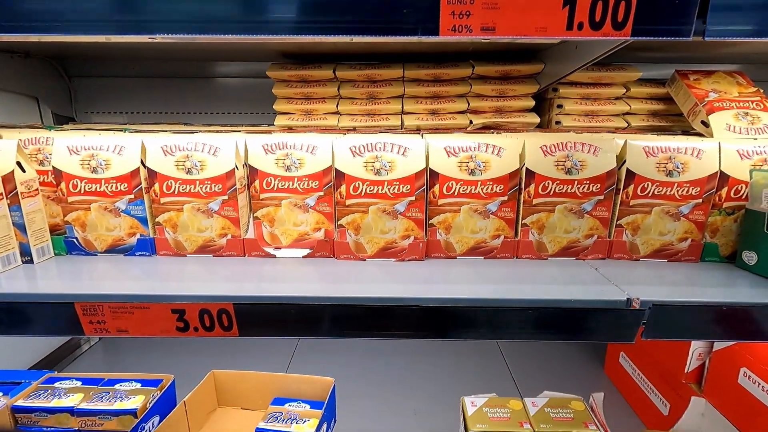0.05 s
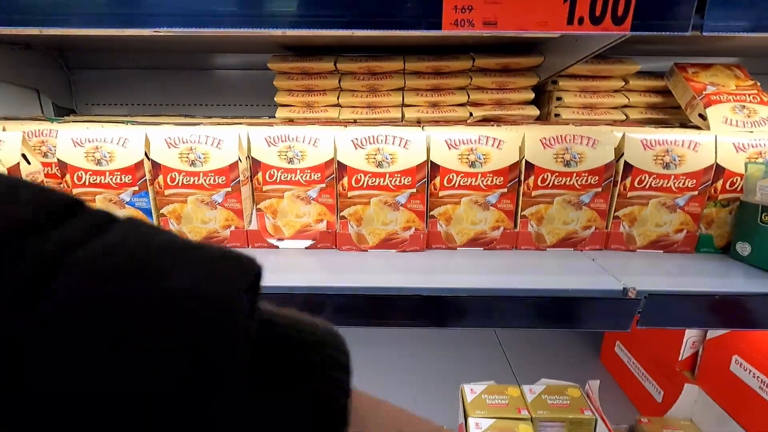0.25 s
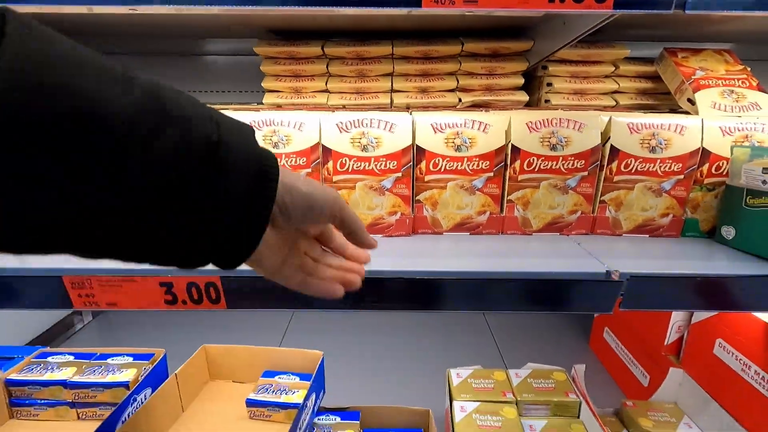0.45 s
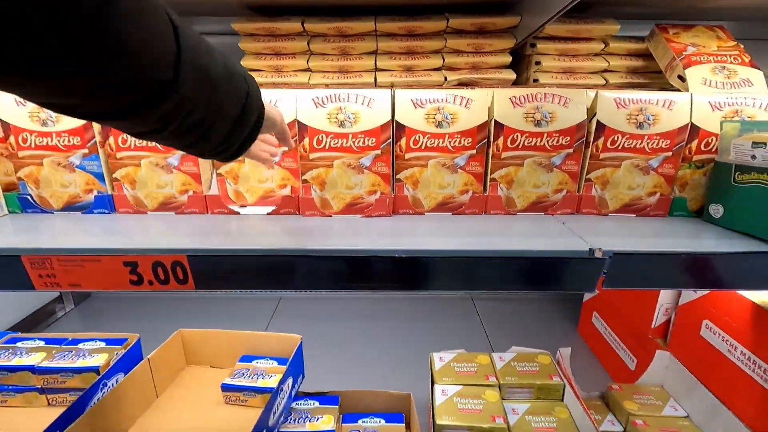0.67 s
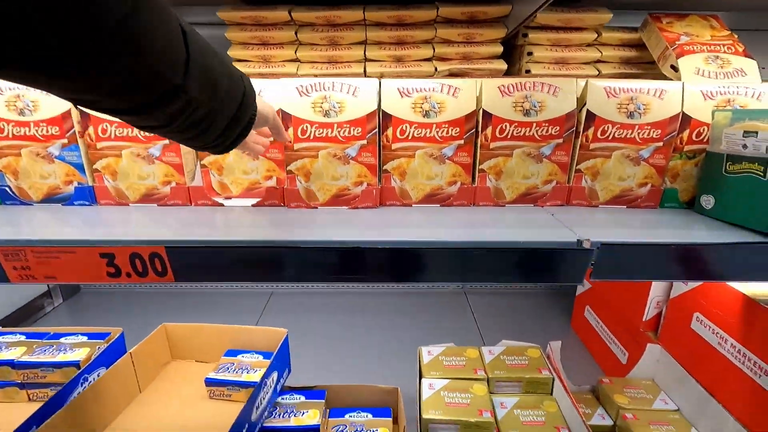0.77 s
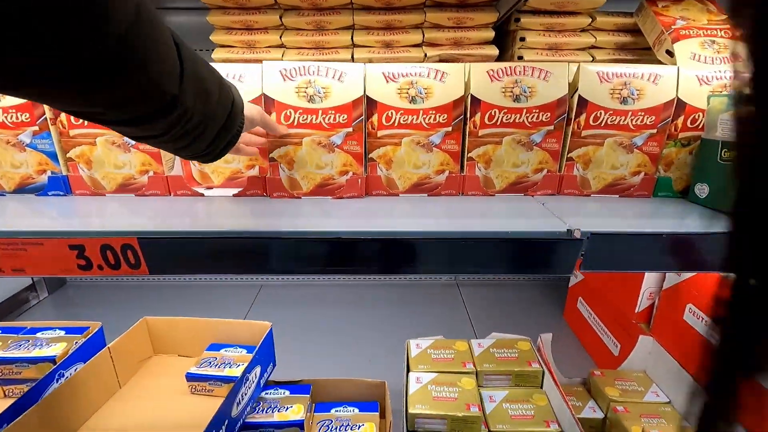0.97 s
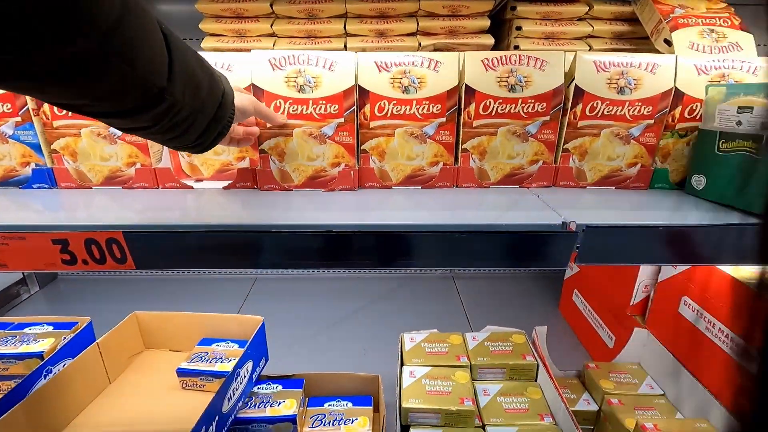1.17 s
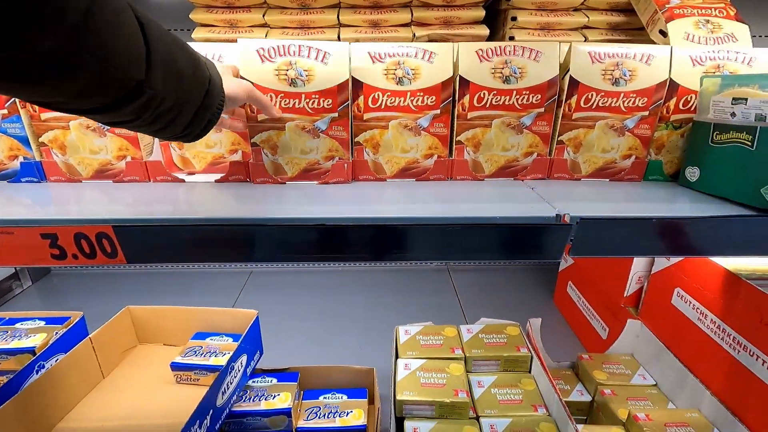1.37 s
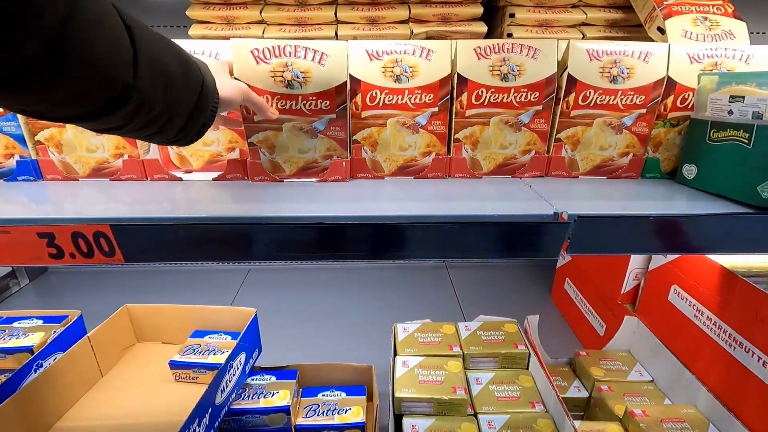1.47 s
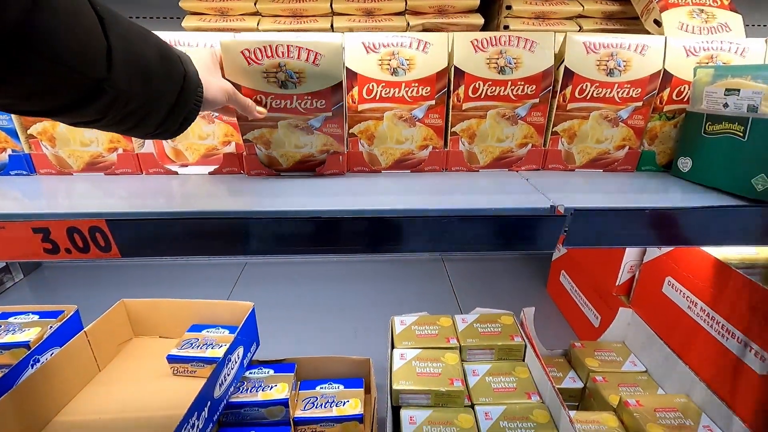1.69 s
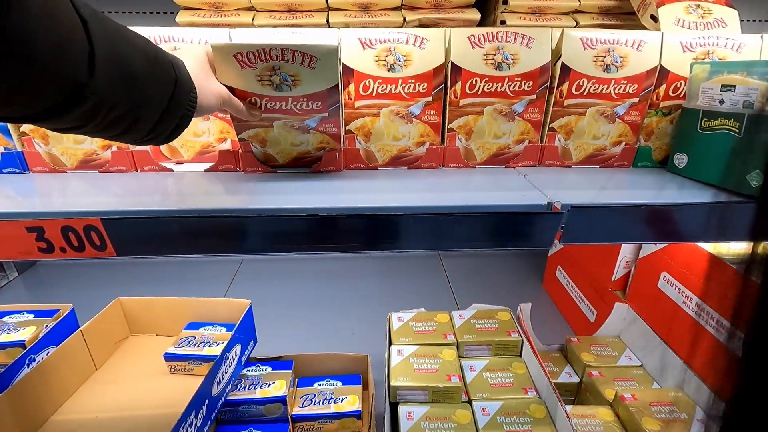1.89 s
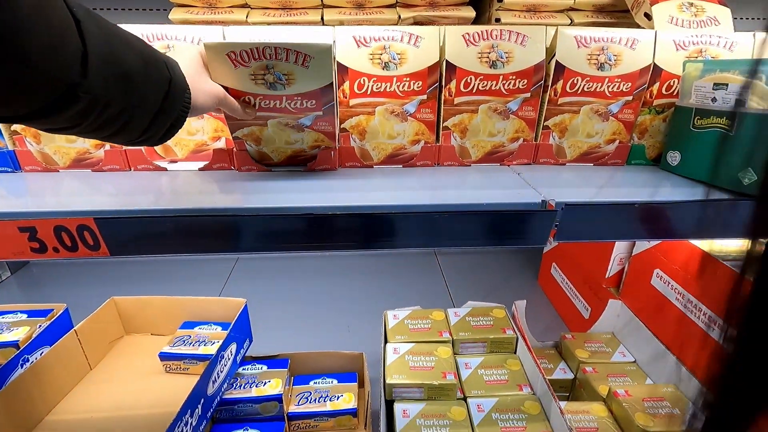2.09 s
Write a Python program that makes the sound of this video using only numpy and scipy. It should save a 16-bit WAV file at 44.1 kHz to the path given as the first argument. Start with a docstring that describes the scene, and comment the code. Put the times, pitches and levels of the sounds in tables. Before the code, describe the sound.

Low refrigerator hum and rushing air, with one small click and faint jacket rustling.

```python
"""An open supermarket chiller hums close by: compressors and mains drone, two fans and a compressor harmonic
beat, and turbulent cold air rushes from the vents and excites the cabinet's resonances. As an arm reaches for a
box, a jacket sleeve swishes and brushes by sliding friction. Something small and hard, perhaps a zip pull,
clicks once in its damped modes, together with a dull bump. Two faint, broad sleeve strokes follow. The stereo
image narrows from the bass up, then reopens a little."""
import sys
import numpy as np
from scipy import signal
from scipy.fft import rfft, irfft
from scipy.io import wavfile

SR = 44100
rng = np.random.default_rng(int(sys.argv[2]) if len(sys.argv) > 2 else 0)


def materialize(psi):
    """Save the field psi as 16-bit PCM at rate SR to the path in sys.argv[1].

    A 1-D psi becomes a single channel; in a 2-D psi each row is a channel.
    """
    bounded = np.clip(np.atleast_2d(psi).T, -1, 1)
    quanta = np.round(bounded * 32767).astype(np.int16)
    wavfile.write(sys.argv[1], SR, quanta)


N = 94197

# sleeve on jacket and box: peak t/s, spread/s, f/Hz, bandwidth/Hz, level/dB, left minus right/dB
BRUSHES = [(.245, 0.03, 1080, 900, -38, 5), (.235, 0.021, 4750, 3500, -53, 3),
           (.315, 0.04, 5640, 2500, -54, -1), (.43, 0.015, 6700, 3000, -57.5, 8),
           (.67, .045, 1480, 1200, -46.5, 0), (.69, 0.052, 3170, 2600, -49.5, 5),
           (.705, .012, 9500, 4000, -67, 1), (1.18, 0.074, 4920, 700, -61, -0.5)]
# sleeve swishes, those at 1.04 s and 1.49 s faint and broad: # peak t/s, rise/s, fall/s, level/dB, left minus
# right/dB
SWISHES = [(.258, 0.033, 0.056, -41, 4), (.39, .06, 0.077, -50, 7.5), (.53, .074, 0.12, -50, 1),
           (.68, .045, .045, -50, 0), (.707, .012, 0.016, -53.5, .5), (.79, .071, .08, -52.5, 4),
           (.95, .01, 0.011, -52, 6), (1.04, 0.089, 0.18, -57.5, 3), (1.49, .061, 0.093, -57, 6),
           (2.025, .012, .015, -58.5, -5)]
# spectrum of rubbing nylon, shared by all the swishes: f/Hz, relative level/dB
SWISH_SPECTRUM = [(300, -14.5), (1000, 3), (1500, 3), (2000, 6), (3000, 1), (5000, -1.5), (7500, -8.5),
                  (8800, -16), (10000, -14), (11200, -23.5), (12200, -17), (13300, -30), (15500, -26.5)]
# contacts within the click: t/s, relative level/dB, tilt/(dB per octave)
CLICK_CONTACTS = [(.2873, -8, 4), (.2886, -1, 2), (.2898, 0, 0), (.2916, -3, -6)]
# modes of the small hard part: f/Hz, relative level/dB, T60/s, left minus right/dB
PART_MODES = [(1082, -7.5, .024, 4), (1518, -4.5, .018, 7), (1985, 1.5, .021, 5), (2385, -15, .016, 4),
              (3720, -11, .009, 3), (4880, -1.5, .011, 0), (6450, -27, .01, 3), (7500, -23, .008, 3),
              (10000, -36, .01, 9)]
# spectrum of the dry scrape at the contacts: f/Hz, relative level/dB
CONTACT_SPECTRUM = [(200, -6), (900, 0), (2000, -1), (2700, -12), (5000, -14), (7500, -21), (9000, -31),
                    (15000, -42)]
# cabinet resonances: f/Hz, bandwidth/Hz, level/dB
CABINET_RESONANCES = [(108, 30, -37), (177, 12, -40.5), (216.7, 16, -43), (332.3, 87, -38),
                      (443.6, 45, -43)]
# spectrum of the rushing air: f/Hz, relative level/dB
AIR_SPECTRUM = [(12, -29), (30, -4), (85, 4), (135, 2.5), (240, .5), (350, -1.5), (520, -6.5), (740, -10.5),
                (1100, -11), (1400, -18), (1850, -21.5), (2400, -27), (3800, -32.5), (5200, -39),
                (7500, -48), (8800, -53), (10200, -57.5), (11200, -62.5), (12300, -62), (13300, -69),
                (15500, -72.5)]
# stereo width of the rush: f/Hz, side minus mid/dB
AIR_WIDTH = [(30, -16), (100, -21), (350, -21.5), (700, -16.5), (1400, -14), (2800, -6), (5000, -12),
             (9000, -5), (13000, -5.5)]
# envelope of the whole rush: t/s, level/dB
AIR_ENVELOPE = [(0, -25.5), (.3, -26.5), (.55, -29), (.85, -27), (1.4, -27), (1.62, -27.5), (1.83, -25.5),
                (1.95, -28.5), (2.14, -27)]
# envelope of its treble: t/s, relative level/dB
HISS_ENVELOPE = [(0, 2), (.5, 2), (.95, 1), (1.12, 0), (1.5, 0.6), (1.85, -2), (2.14, 0.1)]
# compressor shafts, their multiples and the mains: f/Hz, level/dB
DRONE_TONES = [(35.75, -38.5), (42.3, -37), (48.7, -33.5), (71.5, -46), (100.0, -30)]
# hum tones, from two fans and a compressor's third harmonic: f/Hz, relative level/dB
HUM_TONES = [(112.3, 0), (109.9, -15), (107.2, -13)]
# envelope of the hum: t/s, level/dB
HUM_ENVELOPE = [(0, -31), (.05, -38), (.12, -25.5), (.3, -25), (.37, -38), (.45, -24.5), (.6, -28.5),
                (.78, -37), (.88, -29), (1.1, -20.5), (1.17, -35), (1.25, -24), (1.48, -20), (1.555, -32),
                (1.64, -23.5), (1.75, -23), (1.83, -18), (1.95, -34), (2.02, -34), (2.06, -21.5),
                (2.14, -27)]
# stereo image: t/s, mono below f/Hz, gain of the remaining side signal/dB
STEREO_IMAGE = [(0, 200, 3.5), (.19, 145, 4), (.3, 29.8, 6), (.42, 193, 0), (.6, 426, -3.5), (.8, 1100, -7),
                (1.05, 2200, -10), (1.4, 2750, -16.5), (1.7, 3320, -31.5), (1.95, 2220, -11),
                (2.14, 1500, -10)]

FRICTION_SIDE_DB = -7  # side minus mid
SIDE_SIGNS = np.array([[1], [-1]])
TIME = np.arange(N) / SR
BIN_HZ = np.maximum(np.arange(N // 2 + 1) * SR / N, 1e-3)


def undb(db):
    """Amplitude ratio of a level in decibels."""
    return 10 ** (np.asarray(db) / 20)


def unit(x):
    """Normalisation to rms 1."""
    return x / np.sqrt(np.mean(x ** 2))


def curve(rows):
    """Linear interpolation of (t/s, value) rows."""
    return np.interp(TIME, *np.array(rows).T)


def colour(rows):
    """Gain per bin, interpolated in log frequency from (f/Hz, level/dB) rows."""
    hz, db = np.array(rows).T
    return undb(np.interp(np.log(BIN_HZ), np.log(hz), db))


def noise(gain):
    """Random-phase noise of rms 1, shaped by a gain per bin."""
    return unit(irfft(gain * np.exp(2j * np.pi * rng.random(len(gain))), N))


def band_noise(hz, width_hz):
    """Noise with a Lorentzian amplitude spectrum."""
    return noise(1 / (1 + (2 * (BIN_HZ - hz) / width_hz) ** 2))


def stereo_noise(gain, side_gain):
    """Partly coherent channels: sum and difference of independent mid and side noise."""
    side_rms = np.sqrt(np.sum((gain * side_gain) ** 2) / np.sum(gain ** 2))
    return unit(noise(gain) + side_rms * noise(gain * side_gain) * SIDE_SIGNS)


def wander(hz):
    """Random modulation of rms 1 and bandwidth about hz."""
    return noise(np.exp(-.5 * (BIN_HZ / hz) ** 2))


def pan(db):
    """Left and right gains for a level difference."""
    return undb(np.array([[db], [-db]]) / 2)


def sleeve_brushes():
    """Sliding friction on jacket and smooth card gives bands of noise that swell and fade."""
    out = 0
    for at, spread, hz, width, db, pan_db in BRUSHES:
        envelope = np.exp(-.5 * ((TIME - at) / spread) ** 2)
        out = out + undb(db) * pan(pan_db) * envelope * band_noise(hz, width)
    return out


def sleeve_swishes(grain_db=1.1, grain_hz=350):
    """Grainy friction noise of a nylon sleeve, in strokes that add in power."""
    power = 0
    for at, rise, fall, db, pan_db in SWISHES:
        spread = np.where(TIME < at, rise, fall)
        envelope = np.exp(-.5 * ((TIME - at) / spread) ** 2)
        power = power + (undb(db) * pan(pan_db) * envelope) ** 2
    hiss = stereo_noise(colour(SWISH_SPECTRUM), undb(FRICTION_SIDE_DB))
    grain = undb(grain_db * wander(grain_hz))
    return np.sqrt(power) * unit(hiss * grain)


def bump(at_s=.2885, hz=50, db=-22, decay_s=.03):
    """A damped low oscillation gives the dull knock that comes with the click."""
    age = np.maximum(TIME - at_s, 0)
    return undb(db) * pan(db=8) * np.exp(-age / decay_s) * np.sin(2 * np.pi * hz * age)


def contact_envelope(decay_s, hz=2000, pivot_hz=2000, rise_s=.0004):
    """Quick impacts, each duller than the last, add in energy and decay exponentially."""
    energy = 0
    for at, db, tilt in CLICK_CONTACTS:
        age = np.maximum(TIME - at, 0)
        strength = undb(db + tilt * np.log2(hz / pivot_hz))
        attack = 1 - np.exp(-age / rise_s)
        decay = np.exp(-np.minimum(age / decay_s, 100))
        energy = energy + (strength * attack * decay) ** 2
    return np.sqrt(energy)


def click(ring_gain_db=-16.8, scrape_gain_db=-23, chatter_rad=.35, chatter_hz=300):
    """Impacts excite a hard part's damped modes; chatter modulates their phase and contacts scrape."""
    ringing = 0
    for hz, db, t60, pan_db in PART_MODES:
        phase = 2 * np.pi * (hz * TIME + rng.random()) + chatter_rad * wander(chatter_hz)
        envelope = contact_envelope(t60 / np.log(1000), hz)
        ringing = ringing + undb(ring_gain_db + db) * pan(pan_db) * envelope * np.sin(phase)
    scrape = stereo_noise(colour(CONTACT_SPECTRUM), undb(FRICTION_SIDE_DB))
    return ringing + undb(scrape_gain_db) * contact_envelope(decay_s=.002) * scrape


def cabinet():
    """Resonance: driven by the air, the hollow case booms softly in narrow bands."""
    return sum(undb(db) * band_noise(hz, width) for hz, width, db in CABINET_RESONANCES)


def vents(crossover_hz=2000, flicker_db=.3, swell_db=.84):
    """Turbulent flow radiates broadband noise: a slowly swelling rumble under a flickering hiss."""
    air = stereo_noise(colour(AIR_SPECTRUM), colour(AIR_WIDTH))
    rumble = irfft(rfft(air) / (1 + (BIN_HZ / crossover_hz) ** 4), N)
    hiss = (air - rumble) * undb(curve(HISS_ENVELOPE) - flicker_db * wander(hz=9.9))
    return (rumble + hiss) * undb(curve(AIR_ENVELOPE) + swell_db * wander(hz=2.2))


def tones(rows, waver_depth, waver_hz=7.7):
    """Sinusoids with slight random modulation of amplitude and phase."""
    out = 0
    for hz, db in rows:
        sway = 1 + waver_depth * (wander(waver_hz) + 1j * wander(waver_hz))
        carrier = np.exp(2j * np.pi * (hz * TIME + rng.random()))
        out = out + undb(db) * unit(np.real(sway * carrier))
    return out


def compressors():
    """Periodic forcing by the shafts and the mains gives a steady drone."""
    return tones(DRONE_TONES, waver_depth=.13)


def beating_hum():
    """Interference: two fans and a compressor harmonic, close in frequency, beat and swell together."""
    return undb(curve(HUM_ENVELOPE)) * tones(HUM_TONES, waver_depth=.12)


def scene():
    """Superposition of the chiller and the reaching arm."""
    chiller = compressors() + beating_hum() + cabinet() + vents()
    return chiller + sleeve_swishes() + click() + bump() + sleeve_brushes()


def narrow(stereo):
    """A moving high-pass and gain on the side signal set the width and leave the bass mono."""
    at, mono_hz, width_db = np.array(STEREO_IMAGE).T
    hz, t, side_spectra = signal.stft((stereo[0] - stereo[1]) / 2, SR, nperseg=1024)
    cutoff_hz = np.interp(t, at, mono_hz)
    highpass = 1 / (1 + (cutoff_hz / np.maximum(hz[:, None], 1)) ** 6)
    width = undb(np.interp(t, at, width_db))
    _, side = signal.istft(side_spectra * highpass * width, SR)
    return stereo.mean(axis=0) + side[:N] * SIDE_SIGNS


def record(dry, fade_s=.004, top_hz=15700):
    """The image narrows, the ends fade and a steep low-pass limits the bandwidth."""
    fade = np.minimum(np.minimum(TIME, TIME[::-1]) / fade_s, 1)
    lowpass = signal.ellip(10, .1, 80, top_hz, fs=SR, output="sos")
    return signal.sosfilt(lowpass, fade * narrow(dry))


dry = scene()
out = record(dry)
materialize(out)
```